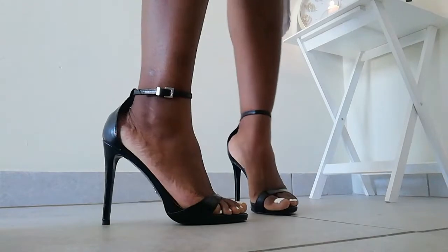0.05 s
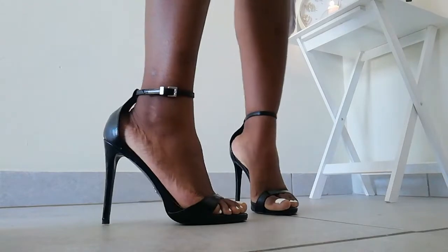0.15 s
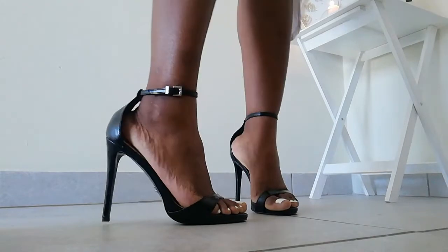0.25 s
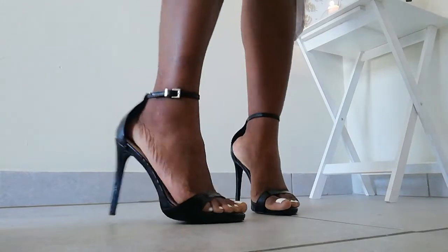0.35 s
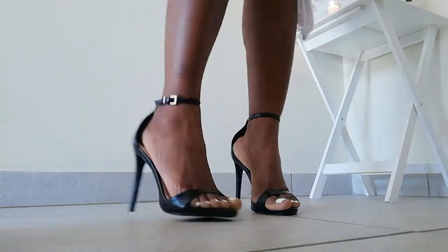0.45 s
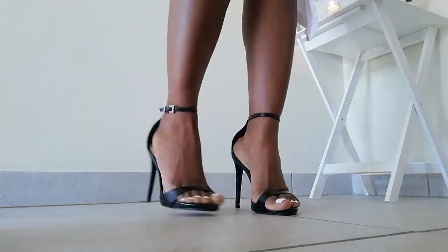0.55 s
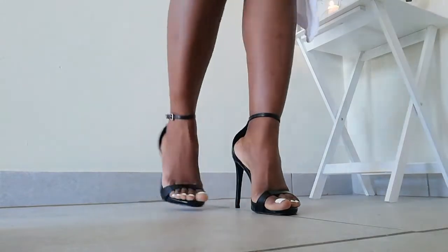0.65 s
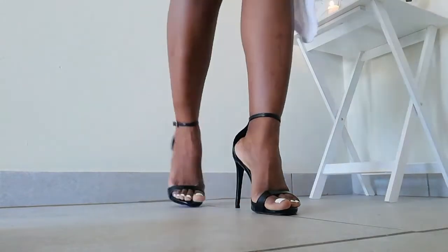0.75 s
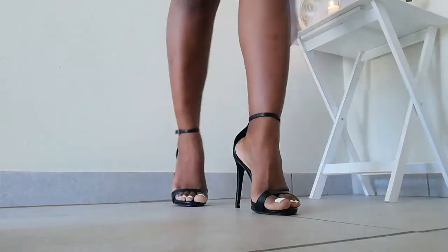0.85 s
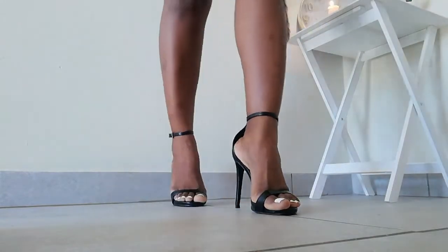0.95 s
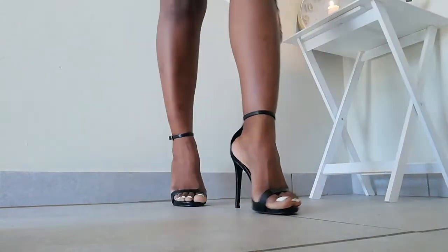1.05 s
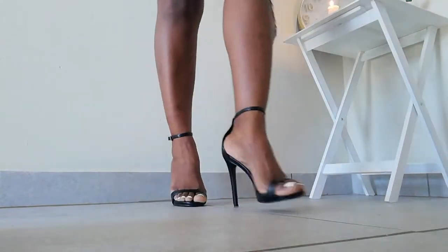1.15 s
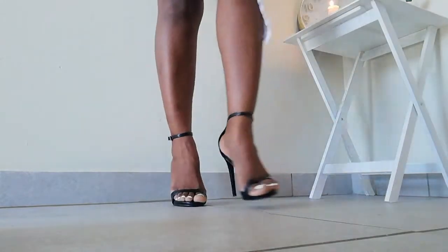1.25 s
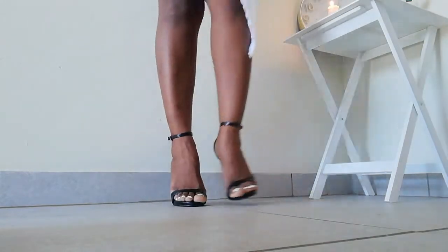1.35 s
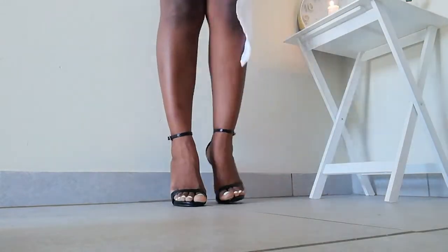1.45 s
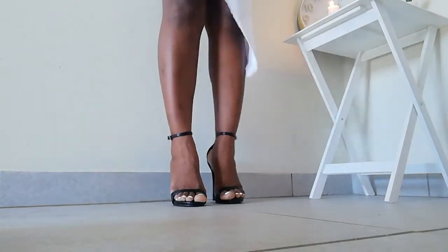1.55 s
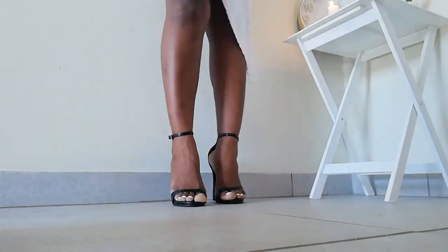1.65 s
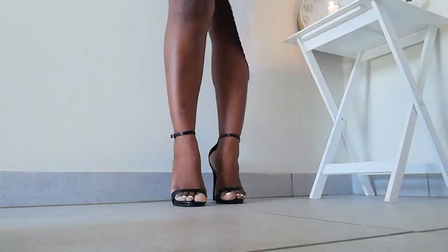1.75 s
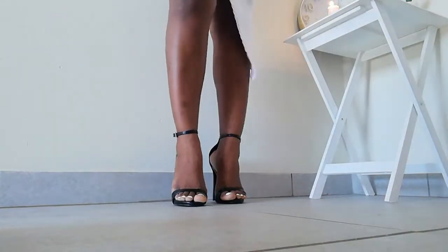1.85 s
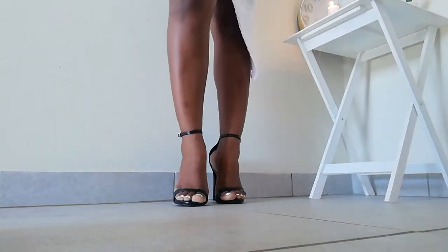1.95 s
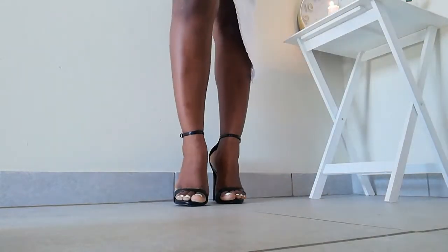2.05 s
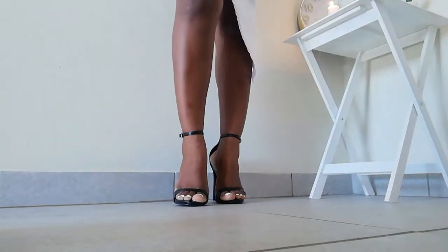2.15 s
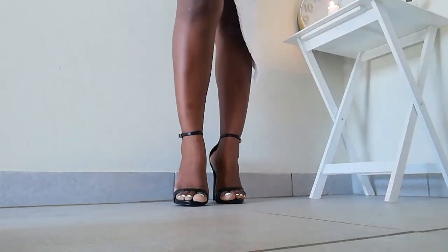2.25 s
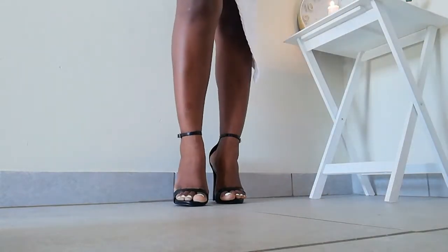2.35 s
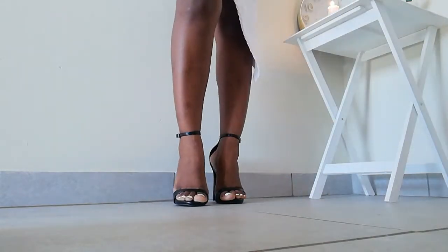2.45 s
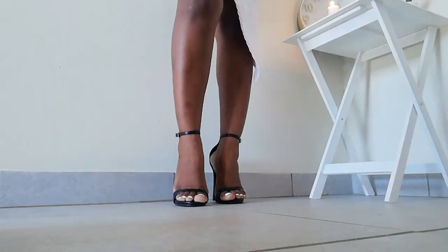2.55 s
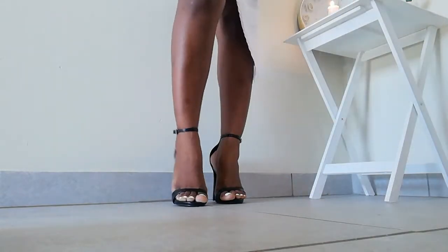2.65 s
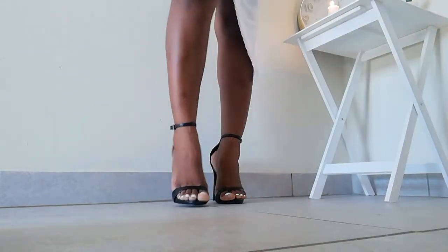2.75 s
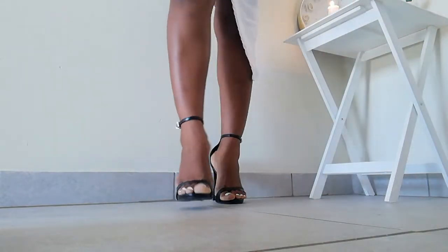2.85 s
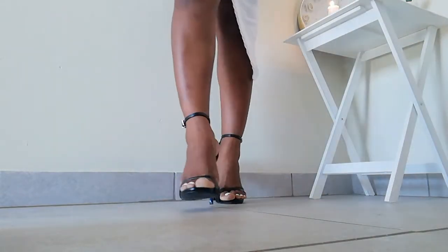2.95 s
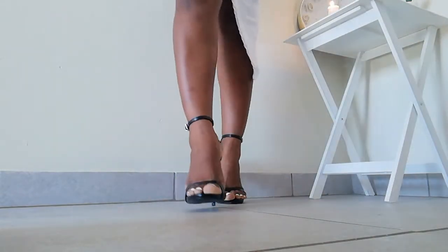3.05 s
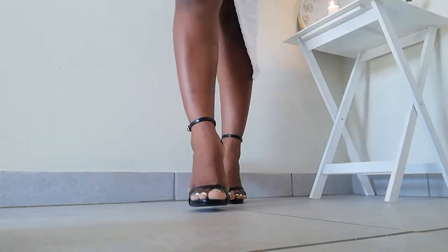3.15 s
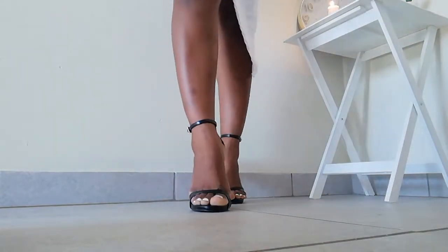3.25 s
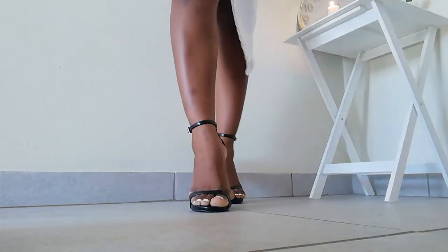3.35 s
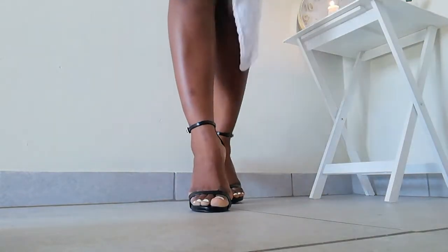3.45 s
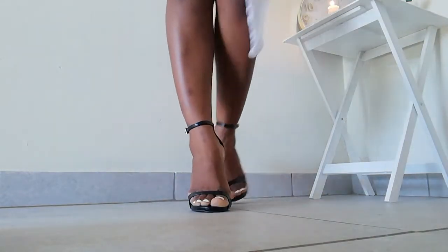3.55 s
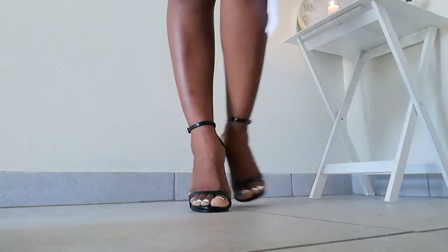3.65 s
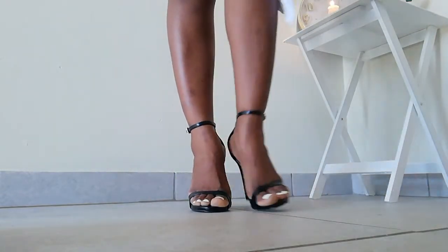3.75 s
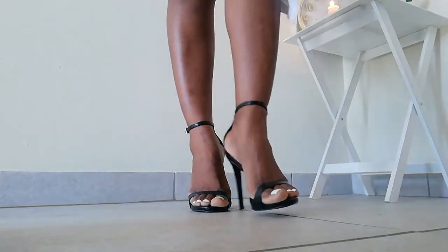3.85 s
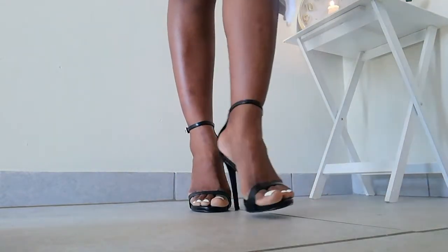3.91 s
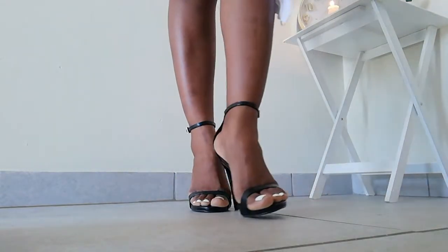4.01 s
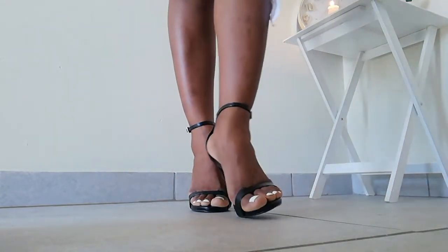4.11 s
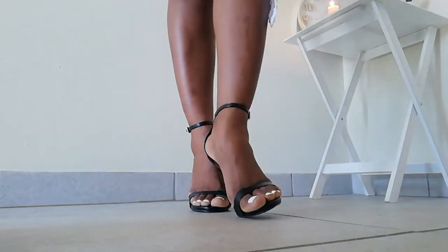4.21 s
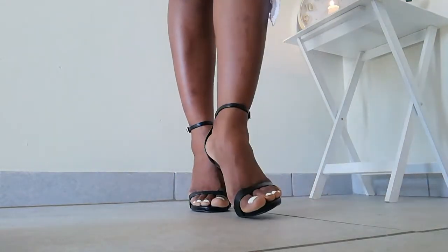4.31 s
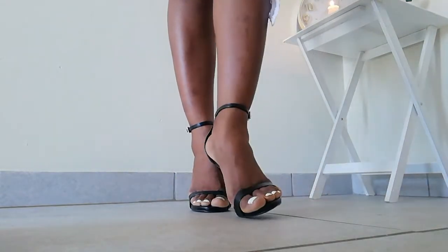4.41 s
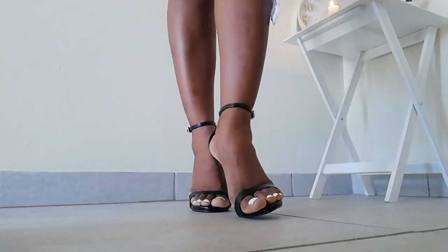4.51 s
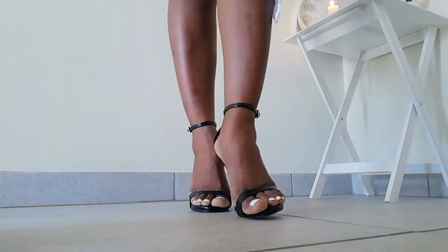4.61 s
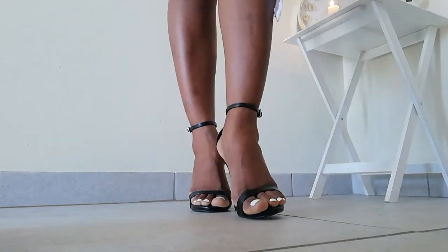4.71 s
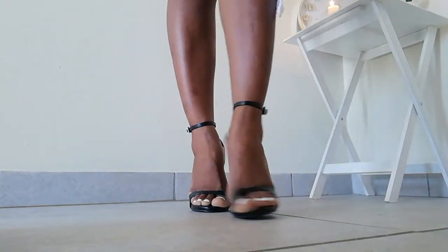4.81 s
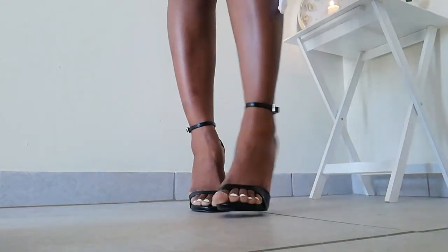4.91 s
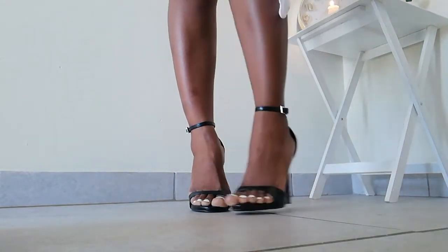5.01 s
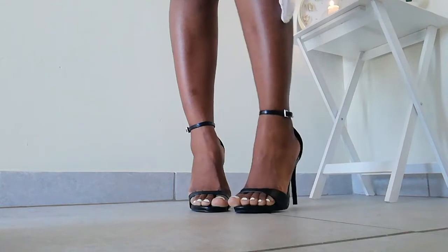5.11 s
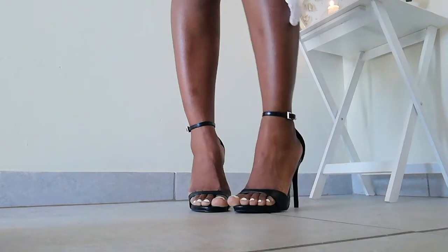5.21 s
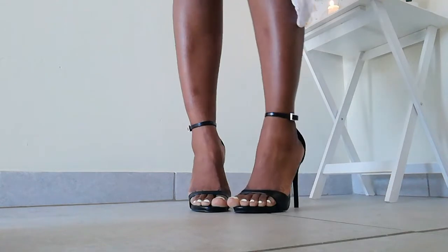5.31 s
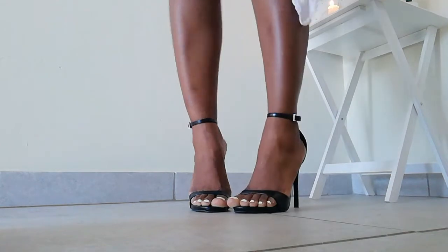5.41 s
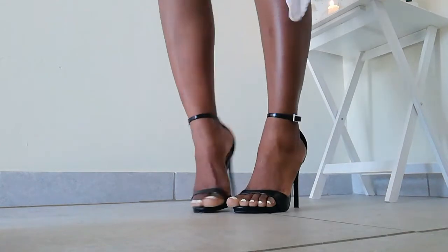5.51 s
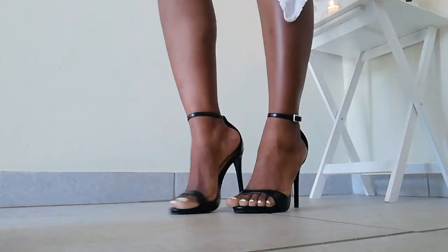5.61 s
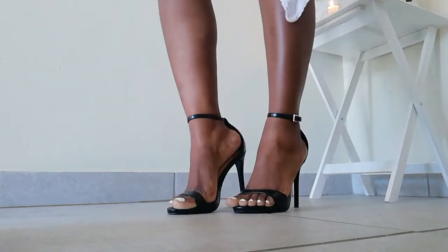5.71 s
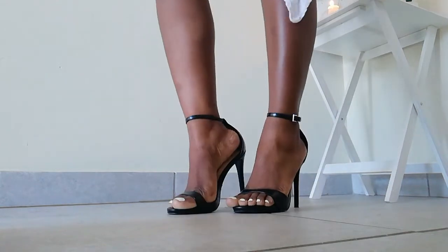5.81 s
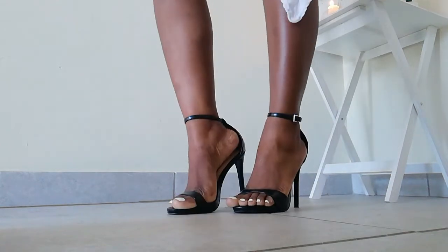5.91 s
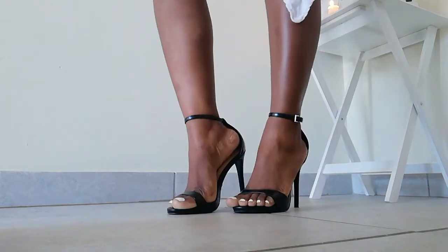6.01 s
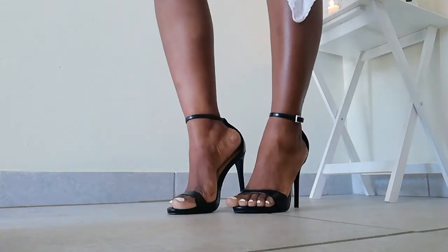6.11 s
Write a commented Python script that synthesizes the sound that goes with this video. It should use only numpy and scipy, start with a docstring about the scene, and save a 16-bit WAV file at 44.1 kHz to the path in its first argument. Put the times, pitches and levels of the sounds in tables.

```python
"""Stiletto heels click close by on a tiled floor as their wearer steps and turns in a bare room.
Soles clop as noise bursts in resonant bands, scuff as grainy friction noise and squeak as
wavering stick-slip tones; one loaded sole judders and sets the floor booming.
Walls and ceiling answer with echoes and a diffuse tail.
Underneath, a deep sine hum swells and fades among low room noise and still air."""
import sys
import numpy as np
from scipy import signal
from scipy.fft import rfft, irfft, next_fast_len
from scipy.io import wavfile
from scipy.ndimage import map_coordinates

SR = 44100
rng = np.random.default_rng(int(sys.argv[2]) if len(sys.argv) > 2 else 0)


def file_out(sig):
    """Save sig as 16-bit WAV at sys.argv[1]."""
    # one column per channel
    cols = np.atleast_2d(sig).T
    # limit, then scale
    lim = np.clip(cols, -1, 1)
    pcm = np.round(lim * 32767).astype(np.int16)
    wavfile.write(sys.argv[1], SR, pcm)


N = 272097  # scene length in samples

THUMP_HZ = 173  # thump of a light graze
TICK_CLACK_HZ, TICK_T60_S = 1190, 0.025
# Graze layers relative to the tip's sizzle, except the clop, which is relative to the clack
TICK_WEIGHT_DB, TICK_CLACK_DB, TICK_SNAP_DB, TICK_CLOP_DB = -18, -18.5, -13.5, -6

# Shoe landings; levels are before the layer trims in contact().
# Columns: t/s, body weight level/dB, clack level/dB, flat-sole clop level/dB, snap level/dB,
# tip sizzle level/dB, thump f/Hz, clack f/Hz, contact t60/s
LANDINGS = [(0.416, -71, -53, -73, -35.5, -29, 180, 1240, 0.042),
            (0.786, -55.5, -43, -87, -52.5, -43.5, 175, 1236, 0.019),
            (1.027, -48.5, -51, -59.5, -67, -63.5, 171, 860, 0.047),
            (1.183, -60.5, -61, -63.5, -64, -50, 166, 1050, 0.51),
            (1.292, -52.5, -74, -85, -93, -73, 85, 910, 0.017),
            (1.513, -64.5, -52, -67, -67, -66, 190, 1630, 0.0092),
            (1.603, -55, -52.5, -58, -72.5, -62, 205.3, 670, 0.026),
            (3.034, -48.5, -48.5, -50.5, -62, -46, 154, 1140, 0.059),
            (3.069, -62, -50, -65, -57, -56, 170, 1240, 0.03),
            (3.262, -54, -50, -60, -51.5, -53, 166, 1031, 0.015),
            (3.891, -50, -46, -47.5, -59.5, -48.5, 334, 1214, 0.048),
            (4.862, -41.5, -45.5, -57.5, -54.5, -46.5, 175, 865, 0.034),
            (5.133, -60.5, -56, -83, -57.5, -43.5, 190, 1303, 0.023),
            (5.367, -62, -68.5, -83, -74, -70, 181, 1116, 0.019)]
# A heel tip grazing the tile with no weight on it. Columns: t/s, sizzle level/dB before trim
HEEL_TICKS = [(0.295, -51), (0.906, -54.5), (1.057, -58.5), (1.097, -56), (1.576, -60.5), (1.645, -60.5),
              (1.72, -56.5), (2.702, -58.5), (2.745, -61), (2.758, -50), (3.409, -62.5), (3.537, -56.5),
              (4.079, -72), (5.433, -60), (5.472, -63)]


def steps():
    """Full landings, and light grazes of the heel tip that all share one colour."""
    out = np.zeros((2, N))
    for s, *landing in LANDINGS:
        add(out, s, contact(*landing))
    for s, db in HEEL_TICKS:
        weight_db = db + TICK_WEIGHT_DB
        clack_db = db + TICK_CLACK_DB
        clop_db = clack_db + TICK_CLOP_DB
        snap_db = db + TICK_SNAP_DB
        graze = contact(weight_db, clack_db, clop_db, snap_db, db, THUMP_HZ, TICK_CLACK_HZ, TICK_T60_S)
        add(out, s, graze)
    return out


CLOP_HZ, SNAP_HZ, SIZZLE_HZ = 1868, 4210, 8710  # bands common to every contact
KNOCK_OVER_THUMP, KNOCK_DB = 2.4, -3  # the sole's knock: pitch ratio and level relative to the thump
PIN_PAN_DB = 5  # left minus right

# Widths of the broad shoe and floor resonances: thump, knock, clack, clop, snap, sizzle.
# Column: width/octaves
RESONANCE_OCTAVES = [0.66, 0.63, 0.62, 0.51, 1.2, 0.41]
# Ringing modes of the heel pin. Columns: f/Hz, level/dB relative to the pin level, t60/s
PIN_MODES = [(2820, 0, .025), (3100, 0, .016), (5800, 0, .025), (8220, 12, .025), (9340, 21, .026)]


def contact(weight_db, clack_db, clop_db, snap_db, sizzle_db, thump_hz, clack_hz, t60):
    """A sharp blow and a brief crunch ring shoe and floor; the landing spot tunes thump and clack."""
    t = np.arange(SR // 5) / SR
    blow_samples = SR / 50

    def level_one(x):
        """Each side scaled to the energy of a 20 ms blow at rms 1."""
        return x * np.sqrt(blow_samples / np.sum(x ** 2, axis=1, keepdims=True))

    rise = 1 - np.exp(-t / 0.0009)
    blow = amp(14 - 60 * t / 0.014)
    force = rise * (amp(-60 * t / t60) + blow)
    crunch = flattened(ports(rng.standard_normal((2, len(t))), side_db=-5.5) * force)
    crack = signal.sosfilt(signal.butter(2, 6000, "highpass", fs=SR, output="sos"), crunch)
    hit = amp(sizzle_db - 17.0) * level_one(crack)

    pitches = [thump_hz, KNOCK_OVER_THUMP * thump_hz, clack_hz, CLOP_HZ, SNAP_HZ, SIZZLE_HZ]
    levels = [weight_db, weight_db + KNOCK_DB, clack_db, clop_db, snap_db, sizzle_db]
    for hz, octaves, db in zip(pitches, RESONANCE_OCTAVES, levels):
        edges = np.clip(hz * 2 ** (np.array([-0.5, 0.5]) * octaves), 20, SR / 2 - 100)
        order = 3 if hz >= CLOP_HZ else 2
        band = signal.butter(order, edges, "bandpass", fs=SR, output="sos")
        ring = signal.sosfilt(band, crunch)
        if hz == thump_hz:
            ring[:] = ring.mean(axis=0)  # long waves reach both sides alike
        hit += amp(db - 3.0) * level_one(ring)

    pin_db = snap_db + 2 * min(snap_db + 45.5, 0)  # a softer snap rings the pin far less
    for hz, db, ring_t60 in PIN_MODES:
        phase = 2 * np.pi * (hz * t + rng.random()) + rng.standard_normal((2, 1))
        tone = np.sin(phase + 0.7 * wobble(350, len(t)))
        decay = amp(pin_db + db - 60 * t / ring_t60)
        hit += panned(rise * decay * tone, PIN_PAN_DB)
    return in_room(hit, wet_db=3)


def flattened(burst):
    """A burst with spectral peaks and gaps evened out, so it has no pitch of its own, then faded."""
    spectrum = rfft(burst)
    t = np.arange(burst.shape[1]) / SR
    even = irfft(spectrum / (np.abs(spectrum) + 1e-9) ** 0.75, len(t))
    return even * amp(-60 * t / 0.2)


# Depth from which a stroke rises and to which it falls; its release
SCUFF_EDGE_DB, SCUFF_RELEASE_S = 19, 0.02

# Spectrum of fine friction, also heard in the squeaks. Columns: f/Hz, level/dB per Hz before scaling
HISS_SPECTRUM = [(1000, -56), (3000, -21.5), (6000, -17), (7300, -10.5), (8300, -3.5), (9400, -3.5),
                 (10300, -14.5), (12000, -22), (15500, -30.5)]
# Spectrum of gritty friction. Columns: f/Hz, level/dB per Hz before scaling
RASP_SPECTRUM = [(200, -32), (800, -8), (1100, -3.5), (1350, 4.5), (1800, 3), (2300, 2), (3200, -1),
                 (6000, -16.5), (12000, -22)]
# A sole dragging; hiss and rasp levels are before trim.
# Columns: t/s, attack/s, hold/s, hiss level/dB, rasp level/dB, swell over the hold/dB
DRAGS = [(0.151, 0.071, .06, -62, -64, -1), (0.232, 0.071, 0.11, -51.5, -74, 7),
         (1.167, .012, 0.017, -59.5, -62.5, 5), (1.334, 0.068, .15, -67, -76.5, 2),
         (1.658, 0.044, 0.028, -59, -88, 1), (2.33, 0.1, .15, -70.5, -73.5, -3),
         (2.611, .065, .03, -62.5, -72, 0), (2.73, 0.02, 0.012, -42, -61, -30),
         (3.47, .075, .105, -56, -72, 3), (4.17, .07, .04, -69.5, -84, -1.5),
         (4.808, .023, .026, -46.5, -55, 1), (5.399, .085, .065, -52, -63, 3.5),
         (5.548, .013, .095, -32.5, -45.5, -5), (5.662, .012, .06, -52, -54, -10)]


def scuffs():
    """A dragged sole hisses; pressed harder, it rasps over the tile."""
    out = np.zeros((2, N))
    for s, attack, hold, hiss_db, rasp_db, swell_db in DRAGS:
        drag = stroke(attack, hold, SCUFF_RELEASE_S, swell_db, SCUFF_EDGE_DB)
        fine_rub = grit(len(drag), rate=1900, side_db=-0.5)
        hiss = amp(hiss_db - 1.0) * coloured(fine_rub, HISS_SPECTRUM)
        coarse_rub = grit(len(drag), rate=500, side_db=-12.5)
        rasp = amp(rasp_db - 2.5) * coloured(coarse_rub, RASP_SPECTRUM)
        scuff = panned(drag * (hiss + rasp), pan_db=0.8)
        add(out, s, in_room(scuff, wet_db=-1.5))
    return out


def grit(size, rate, side_db):
    """Stereo friction: sparse grains, rate a second on average, break loose over a fine rub."""
    grains = rng.standard_normal((2, size)) * (rng.random(size) < rate / SR)
    pressure = amp(2 * wobble(300, size))
    rub = 1.54 * rng.standard_normal((2, size))
    return ports(unit(grains) + rub, side_db) * pressure


def stroke(attack, hold, release, swell_db, edge_db):
    """Gain of a rubbing stroke: it rises, swells or sags while held, and lets go."""
    times = np.cumsum(np.abs([0, attack, hold, release]))
    t = np.arange(int(times[-1] * SR)) / SR
    return amp(np.interp(t, times, [-edge_db, 0, swell_db, swell_db - edge_db]))


JUDDER_START_S, JUDDER_ATTACK_S, JUDDER_HOLD_S, JUDDER_RELEASE_S = 4.822, 0.0183, 0.0206, 0.0084
JUDDER_HZ, JUDDER_DB, JUDDER_SWELL_DB, JUDDER_EDGE_DB = 157.6, -43, 3.5, 23
FLOOR_HZ, FLOOR_DB, FLOOR_T60_S = 167.5, -52, 0.51


def judder():
    """Slow stick-slip under full weight grows until the sole lands; the floor rings on, a little higher."""
    def tone(hz, t):
        """A sine with a weak octave, alike on both sides."""
        wave = np.sin(2 * np.pi * hz * t) + 0.13 * np.sin(4 * np.pi * hz * t)
        return unit(wave) * np.ones((2, 1))

    gain = stroke(JUDDER_ATTACK_S, JUDDER_HOLD_S, JUDDER_RELEASE_S, JUDDER_SWELL_DB, JUDDER_EDGE_DB)
    push = amp(JUDDER_DB) * gain
    t = np.arange(SR // 2) / SR
    boom = np.zeros((2, len(t)))
    add(boom, 0, push * tone(JUDDER_HZ, t[:len(push)]))
    floor_ring = amp(FLOOR_DB - 60 * t / FLOOR_T60_S) * tone(FLOOR_HZ, t)
    add(boom, JUDDER_ATTACK_S + JUDDER_HOLD_S, floor_ring)
    out = np.zeros((2, N))
    add(out, JUDDER_START_S, boom)
    add(out, JUDDER_START_S, amp(-11) * in_room(boom, wet_db=7.0))
    return out


SQUEAK_ATTACK_S, SQUEAK_RELEASE_S = 0.013, 0.02
SQUEAK_SETTLE_S = 0.018  # time constant of the slide onto pitch
SQUEAK_EDGE_DB, SQUEAK_SAG_DB = 8, 4  # depth of attack and release; loss over the hold
SQUEAK_WAVER, SQUEAK_WAVER_PER_S = 0.0124, 44.6  # slow pitch unsteadiness: share, knots a second

# A sole sticking and slipping as it turns; tone levels are before trim.
# Columns: t/s, hold/s, starting f/Hz, settled f/Hz, lower tone level/dB, upper tone level/dB,
# pitch scatter/share
PIVOTS = [(1.732, 0.024, 4800, 5400, -76, -58, 0.018), (1.759, 0.0085, 5130, 5330, -56, -63, .017),
          (1.783, 0.083, 4450, 5190, -51.5, -54, 0.016), (1.881, .055, 5030, 5087, -55.5, -52, .022),
          (1.968, .033, 5100, 5054, -59.5, -49, 0.029), (2.007, .008, 4760, 5100, -52.5, -53, 0.06),
          (2.162, 0.1, 3600, 3526, -75.5, -94.5, .015), (2.726, 0.018, 3600, 3700, -63.5, -85, .025),
          (2.909, 0.048, 5450, 5200, -61, -50.5, 0.049), (2.953, 0.046, 5700, 4884, -48.5, -50, 0.092),
          (4.48, 0.038, 4554, 4500, -78, -93, 0.028), (4.7, 0.011, 3350, 3190, -64.5, -92.5, .045),
          (4.728, 0.02, 3610, 3330, -68, -92.5, 0.042)]


def squeaks():
    """Stick-slip slides onto its pitch: two unsteady, inharmonic tones, a rough strand and some hiss."""
    def tone(pitch, scatter):
        """A sine whose pitch jitters fast by the scatter share."""
        jittered = pitch * (1 + scatter * wobble(1800, len(pitch)))
        return unit(np.sin(2 * np.pi * np.cumsum(jittered) / SR))

    out = np.zeros((2, N))
    for s, hold, start_hz, settled_hz, lower_db, upper_db, rough in PIVOTS:
        grip = stroke(SQUEAK_ATTACK_S, hold, SQUEAK_RELEASE_S, -SQUEAK_SAG_DB, SQUEAK_EDGE_DB)
        size = len(grip)
        slide = np.exp(-np.arange(size) / SR / SQUEAK_SETTLE_S)
        hz = settled_hz + (start_hz - settled_hz) * slide
        hz = hz * (1 + SQUEAK_WAVER * wobble(SQUEAK_WAVER_PER_S, size))
        song = amp(lower_db - 2.5) * tone(hz, rough)
        song += amp(upper_db - 4.5) * tone(1.59 * hz, 0.61 * rough)
        song += amp(lower_db - 14) * tone(0.82 * hz, 0.06)  # rough strand
        song *= amp(2.5 * wobble(93, size))  # the grip comes and goes
        rub = grit(size, rate=880, side_db=-1.0)
        hiss = amp(upper_db - 3.5) * coloured(rub, HISS_SPECTRUM)
        add(out, s, in_room(grip * (song + hiss), wet_db=0.5))
    return out


# Nearby walls and ceiling. Columns: delay t/s before scatter, level/dB
EARLY_ECHOES = [(.0022, -34.5), (.0041, -5.5), (.0068, -9), (0.0114, -7.5), (0.014, -13.5)]
# Decay of the diffuse tail. Columns: f/Hz, t60/s
TAIL_T60 = [(150, 0.73), (500, 1), (1300, 0.84), (3000, 0.7), (6000, 0.56), (9000, 0.45), (15000, 0.16)]
# Colour of the diffuse tail. Columns: f/Hz, relative level/dB
TAIL_COLOUR = [(150, 1.5), (500, -1.5), (1300, -2.5), (3000, -2), (6000, -1), (9000, -4.5), (15000, 3.5)]


def in_room(sound, wet_db):
    """The sound with scattered early echoes and a decaying noise tail, both drawn anew each time."""
    noise = unit(ports(rng.standard_normal((2, SR)), side_db=-1.5))
    hz, t, z = signal.stft(noise, SR, nperseg=256)
    fade = amp(along(TAIL_COLOUR, hz)[:, None] - 60 * t / along(TAIL_T60, hz)[:, None])
    tail = signal.istft(z * fade, SR, nperseg=256)[1][:, :SR]
    build_up = 1 - np.exp(-np.arange(SR) / SR / 0.0049)
    response = tail * build_up * amp(wet_db - 32.0)
    response[:, 0] += 1  # direct sound
    for delay, db in EARLY_ECHOES:
        arrival = (delay * SR * np.exp(0.08 * rng.standard_normal(2))).astype(int)
        response[[0, 1], arrival] += amp(db)
    return signal.fftconvolve(sound, response, axes=1)


HUM_FLUTTER_DB, HUM_FLUTTER_PER_S = 3.05, 11  # waver of the hum's level: size, knots a second

# Slow path of the deep hum, before waver and trim. Columns: t/s, level/dB, f/Hz
HUM_PATH = [(0.0, -64, 39), (0.19, -74, 35.7), (0.55, -57.5, 35.68), (0.81, -46.5, 40.37),
            (1.22, -49.5, 42.3), (1.31, -46.5, 44.8), (1.36, -60, 45.1), (1.49, -44.5, 45.1),
            (1.84, -54, 46.67), (1.99, -46.5, 42.46), (2.25, -68, 42.4), (2.42, -46.5, 42.9),
            (2.58, -51.5, 44), (2.7, -64, 48.5), (2.89, -66, 49.2), (2.99, -76, 42.7), (3.08, -56.5, 42.47),
            (3.37, -69.5, 43.93), (4.18, -63, 42.36), (4.35, -74.5, 42.1), (4.52, -69, 47.95),
            (4.78, -78, 49.6), (5.05, -55, 44.6), (5.29, -67.5, 45.25), (5.52, -59.5, 46.8),
            (5.74, -55, 42.6), (5.91, -61, 50.7), (6.17, -79.5, 51.6)]
# Spectrum of still air. Columns: f/Hz, level/dB per Hz before scaling
AIR_SPECTRUM = [(60, -27), (120, -7), (200, -4.5), (270, -5.5), (330, -13), (600, -19.5), (1100, -18),
                (3400, -25), (6600, -30), (8600, -26), (11500, -34.5), (15800, -35.5)]


def background():
    """A deep sine hum wavers in pitch and level with rumble, over low room noise and still air."""
    s, level, pitch = np.transpose(HUM_PATH)
    t = np.arange(N) / SR
    hz = np.interp(t, s, pitch) + 1.95 * wobble(13, N)
    phase = 2 * np.pi * np.cumsum(hz) / SR
    rumble_spectrum = [(15, -34), (42, -0.5), (60, -8.0), (110, -17.0), (400, -40), (2000, -100)]
    rumble = coloured(rng.standard_normal(N), rumble_spectrum)
    hum_db = np.interp(t, s, level) + HUM_FLUTTER_DB * wobble(HUM_FLUTTER_PER_S, N) - 0.5
    hum = amp(hum_db) * unit(np.sin(phase) + 0.2 * rumble)

    boom_spectrum = [(20, -19), (45, -10.0), (70, 4), (100, -2), (130, -18.5), (168, 4.5),
                     (190, -19.0), (500, -40.5)]
    boom = amp(-68.5) * coloured(rng.standard_normal(N), boom_spectrum)
    mid, side = coloured(rng.standard_normal((2, N)), AIR_SPECTRUM)
    air = amp(-67) * ports([mid, side], side_db=-1.0)
    return hum + boom + air


def amp(db):
    """Decibels to gain."""
    return 10 ** (np.asarray(db) / 20)


def unit(x):
    """Scale to rms 1."""
    return x / np.sqrt(np.mean(x ** 2) + 1e-20)


def along(points, hz):
    """(f/Hz, value) points read on a log frequency axis."""
    f, v = np.transpose(points)
    return np.interp(np.log(hz + 1), np.log(f), v)


def wobble(rate, size):
    """A smooth random curve with rate knots a second."""
    knots = rng.standard_normal(int(size * rate / SR) + 4)
    return map_coordinates(knots, [np.arange(size) * rate / SR])


def filtered(x, response):
    """x with its spectrum multiplied by a response of frequency."""
    n = x.shape[-1]
    m = next_fast_len(n + 8192)  # padding keeps the end from wrapping onto the start
    return irfft(rfft(x, m) * response(np.fft.rfftfreq(m, 1 / SR)), m)[..., :n]


def coloured(x, spectrum):
    """x shaped by the given spectrum, at rms 1."""
    return unit(filtered(x, lambda hz: amp(along(spectrum, hz))))


def add(track, s, sound):
    """Mix a stereo sound into the track at time s."""
    part = track[:, max(int(s * SR), 0):][:, :sound.shape[1]]
    part += sound[:, :part.shape[1]]


def ports(pair, side_db):
    """Left and right from a shared signal and a difference signal scaled by side_db."""
    side = amp(side_db) * pair[1]
    return np.array([pair[0] + side, pair[0] - side])


def panned(sound, pan_db):
    """The sound with its left side raised pan_db against its right."""
    return sound * amp([[pan_db / 2], [-pan_db / 2]])


def scene():
    """Feet and room together."""
    return steps() + scuffs() + judder() + squeaks() + background()


TOP_HZ = 15800  # band limit


def record(dry):
    """Two close ports hear the bass nearly alike; nothing passes above the band limit."""
    mid, side = (dry[0] + dry[1]) / 2, (dry[0] - dry[1]) / 2
    side_gain = [(60, -10.0), (170, -19.0), (320, 1.5)]  # f/Hz, level/dB
    side = filtered(side, lambda hz: amp(along(side_gain, hz)))
    return filtered(np.array([mid + side, mid - side]), lambda hz: hz < TOP_HZ)


dry = scene()
out = record(dry)
file_out(out)
```